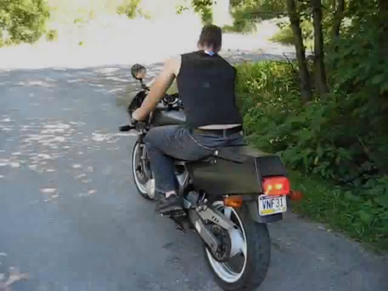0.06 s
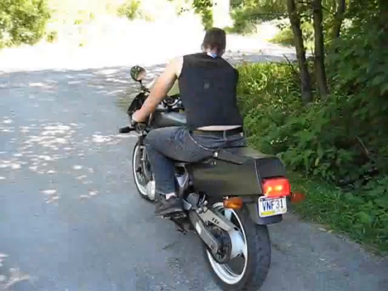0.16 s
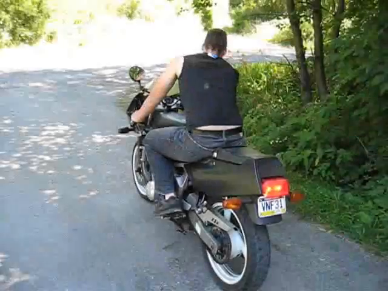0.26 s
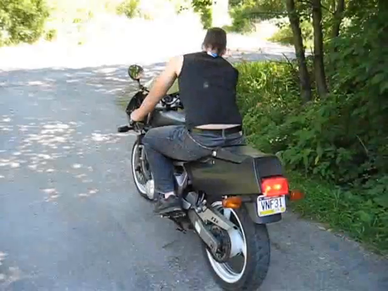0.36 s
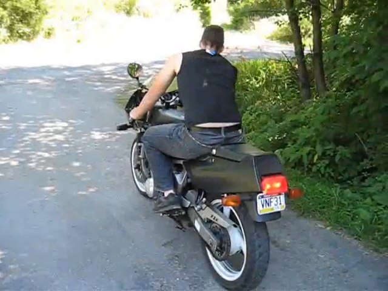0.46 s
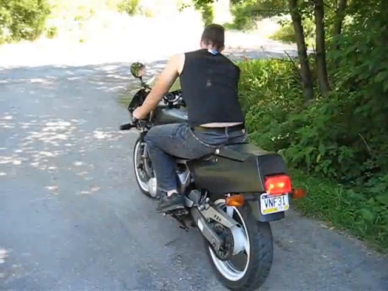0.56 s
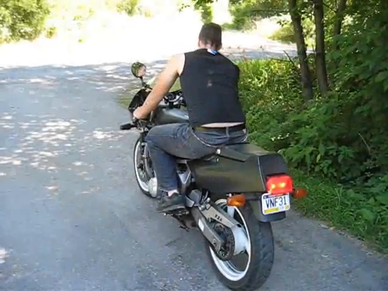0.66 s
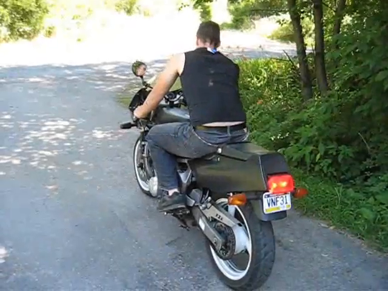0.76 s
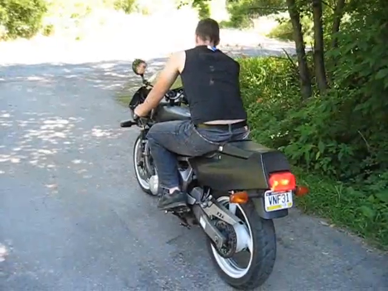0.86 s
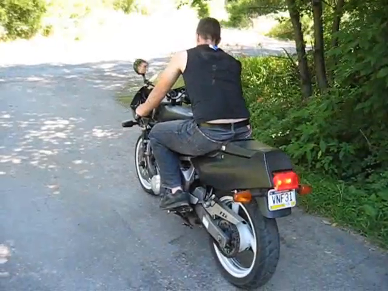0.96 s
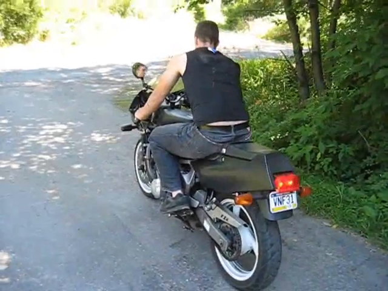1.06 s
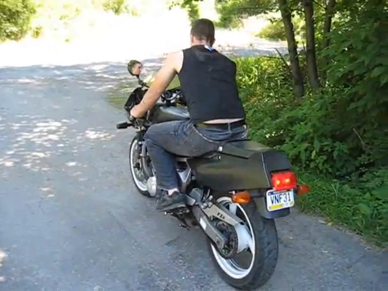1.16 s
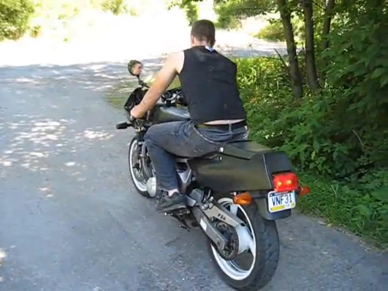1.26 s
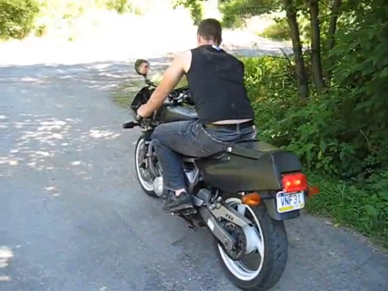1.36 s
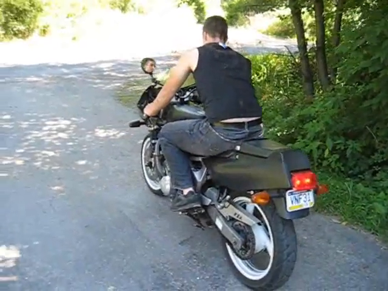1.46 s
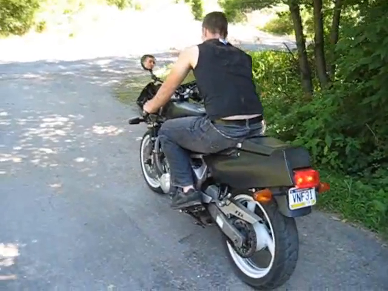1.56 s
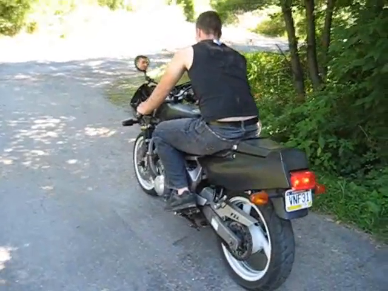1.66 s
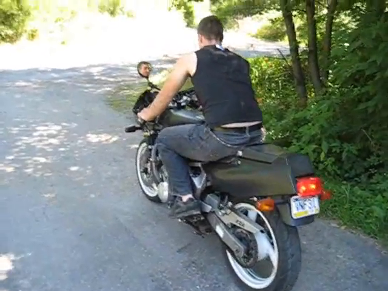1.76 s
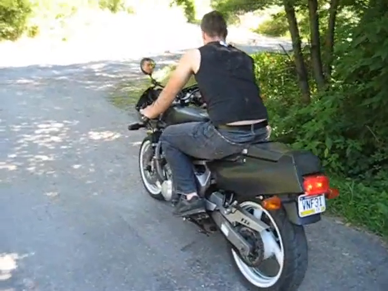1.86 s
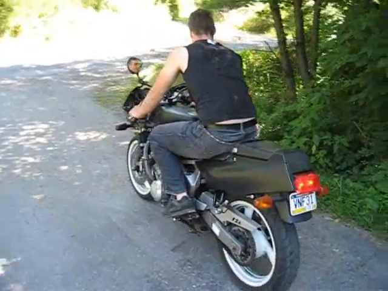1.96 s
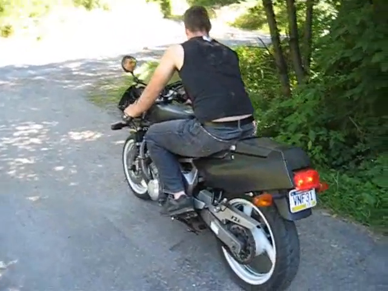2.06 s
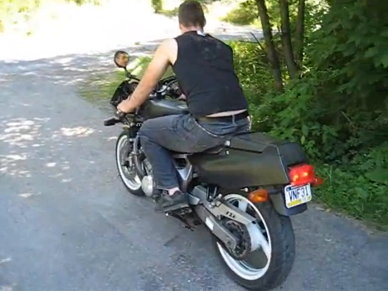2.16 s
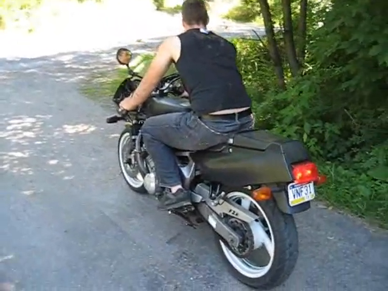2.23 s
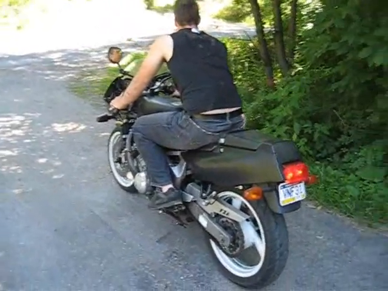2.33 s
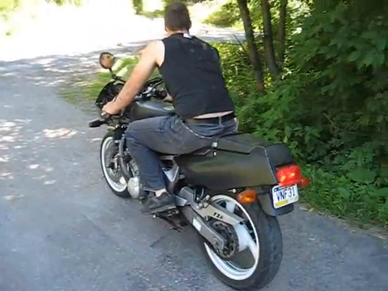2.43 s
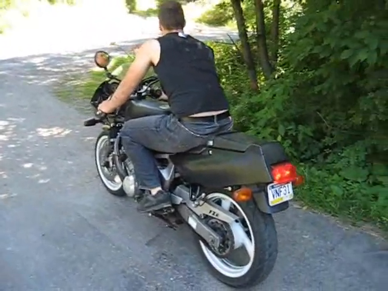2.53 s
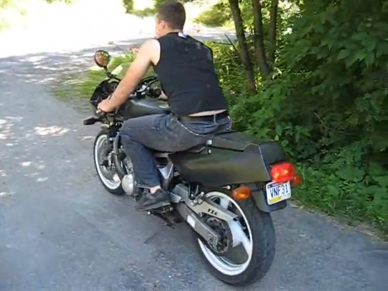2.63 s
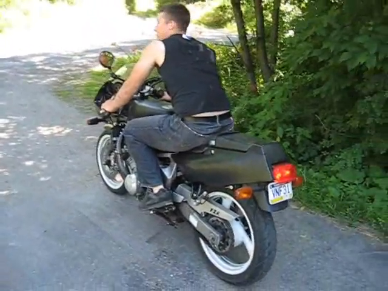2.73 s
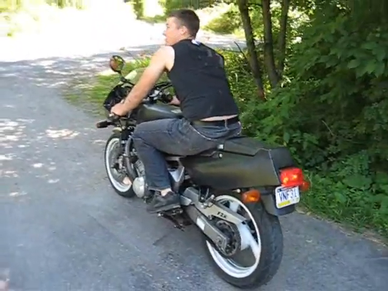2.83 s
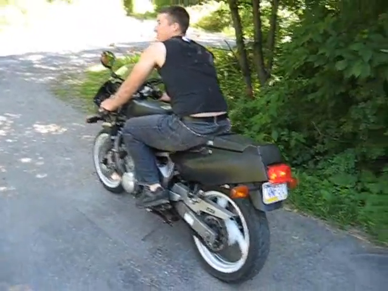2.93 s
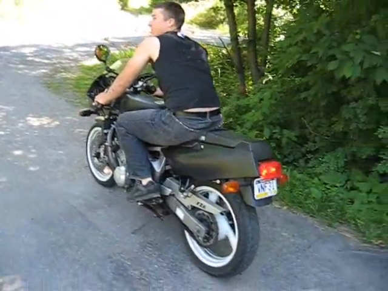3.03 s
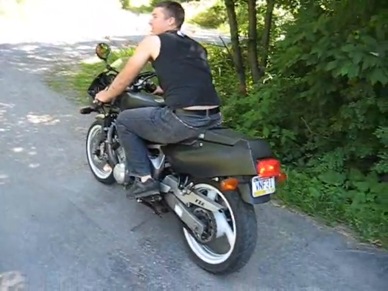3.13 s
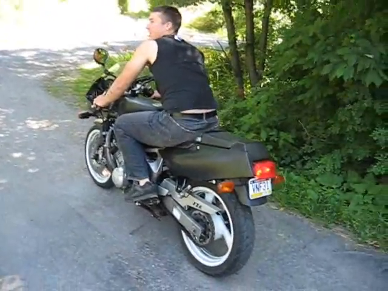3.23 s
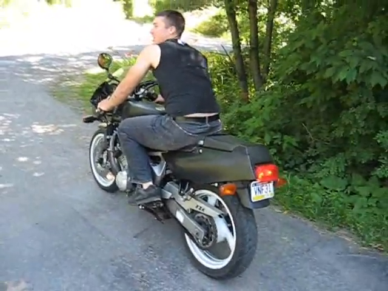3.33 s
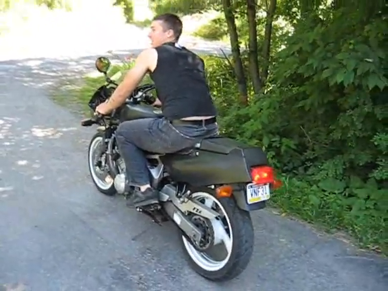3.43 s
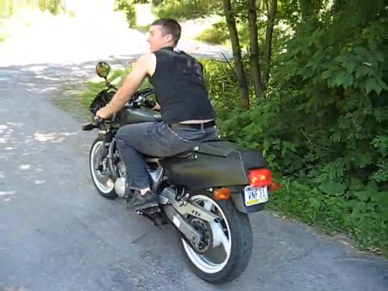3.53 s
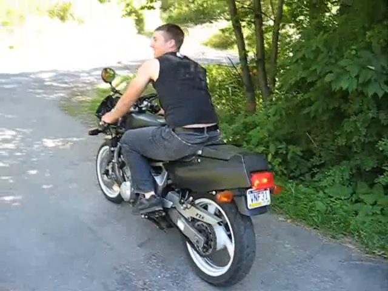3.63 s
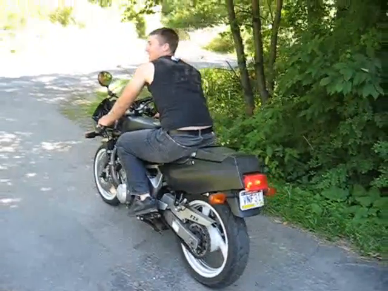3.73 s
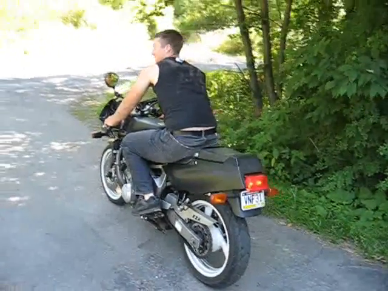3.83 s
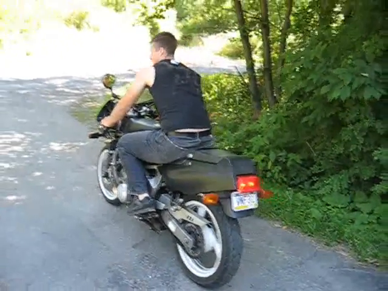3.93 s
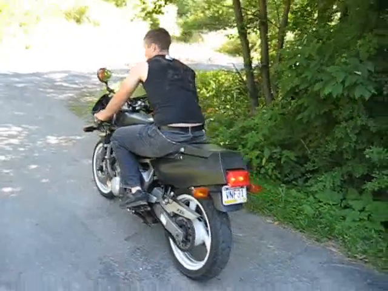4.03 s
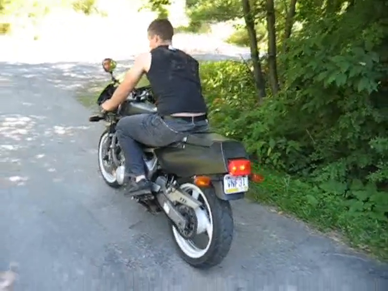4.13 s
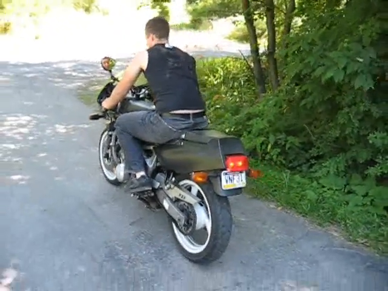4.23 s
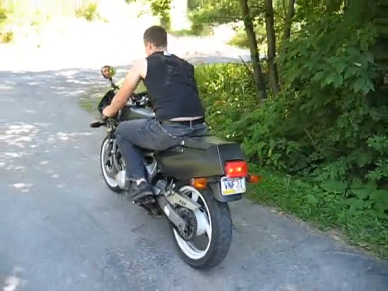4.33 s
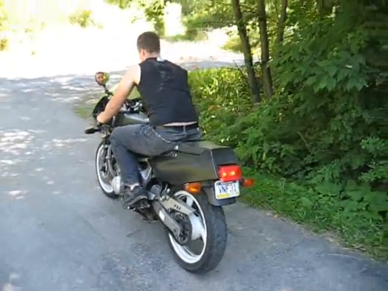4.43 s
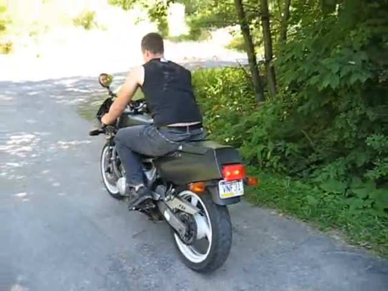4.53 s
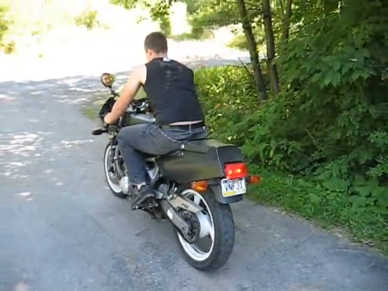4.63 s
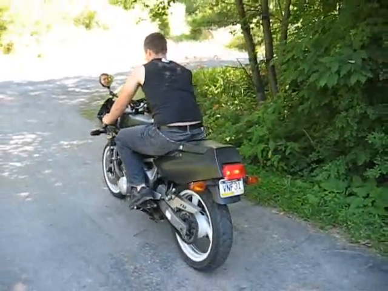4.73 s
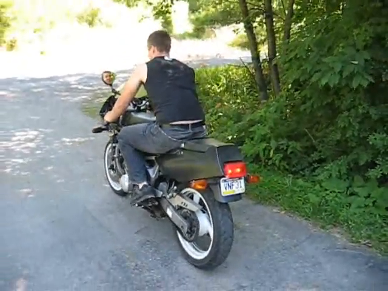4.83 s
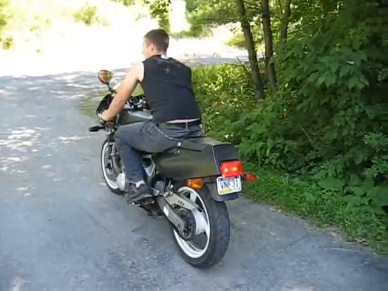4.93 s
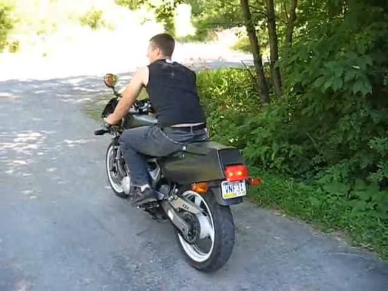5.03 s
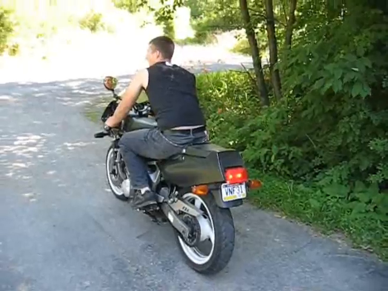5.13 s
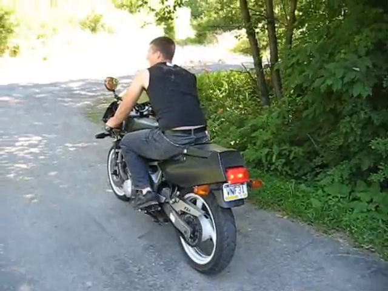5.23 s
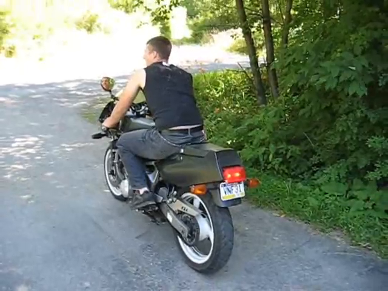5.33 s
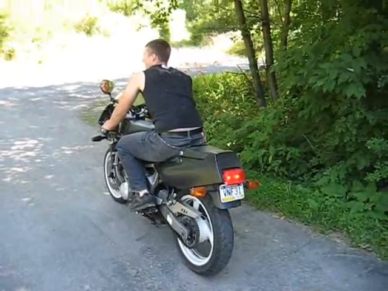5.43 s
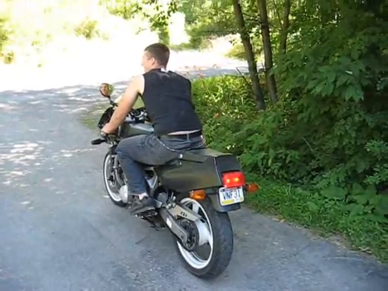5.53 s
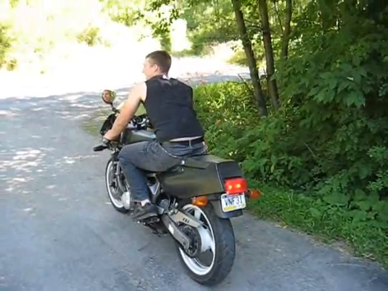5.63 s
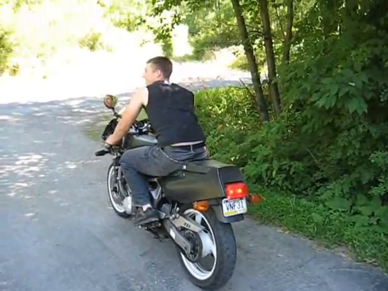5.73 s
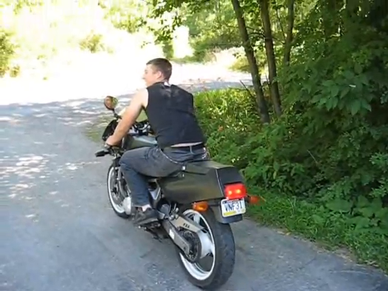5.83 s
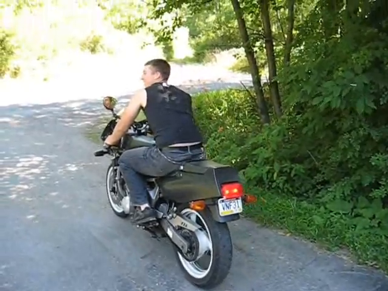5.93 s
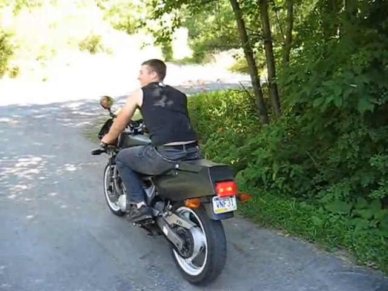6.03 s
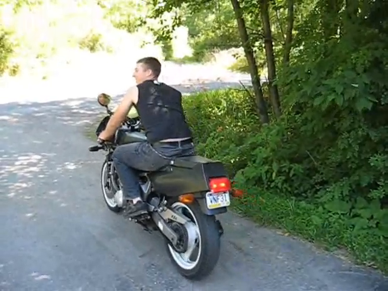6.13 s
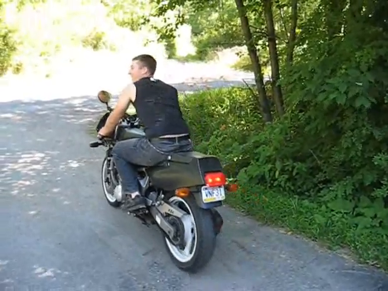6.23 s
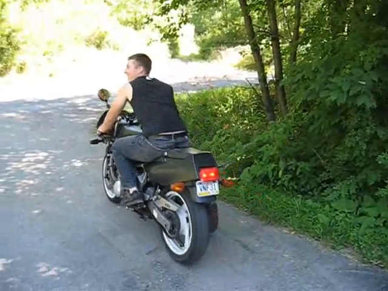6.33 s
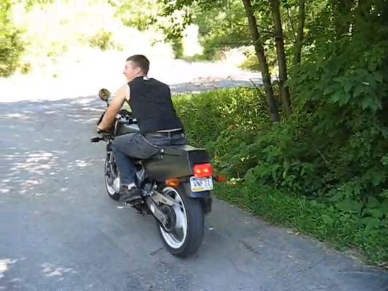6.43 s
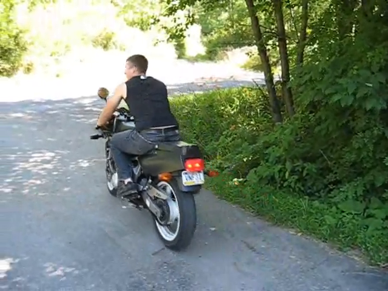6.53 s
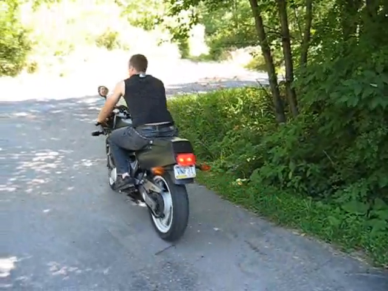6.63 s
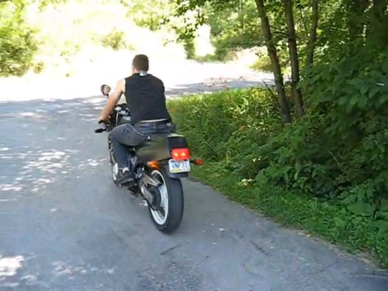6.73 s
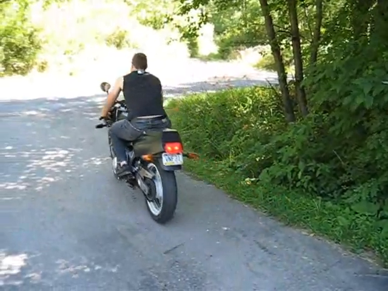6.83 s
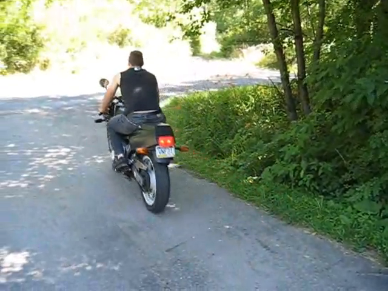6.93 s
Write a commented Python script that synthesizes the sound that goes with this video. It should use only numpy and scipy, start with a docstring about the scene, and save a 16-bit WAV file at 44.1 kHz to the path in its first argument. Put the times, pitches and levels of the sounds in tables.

```python
"""A four-cylinder motorcycle with open headers catches, idles unevenly, is blipped three times and pulls away.
Exhaust strokes kick resonant pipes, with stronger full burns at low revs and noise for the escaping gas.
Before it catches, the starter grinds and whines: noise through housing modes, and sliding overtones.
Birds whistle through tree echoes; thin steady sine tones fade out early over noise for the lane beside the trees.
A small recorder overloads and samples coarsely; its held values mirror the lower sound into the treble."""
import sys
import numpy as np
from scipy import signal
from scipy.fft import rfft, irfft, next_fast_len
from scipy.io import wavfile
from scipy.ndimage import uniform_filter1d

SR = 44100
rng = np.random.default_rng(int(sys.argv[2]) if len(sys.argv) > 2 else 0)


def log_audio(samples):
    """Write samples as a 16-bit WAV file to the path given in sys.argv[1]."""
    # one column per channel
    frames = np.atleast_2d(samples).T
    # limit to full scale, then quantise
    limited = np.clip(frames, -1, 1)
    pcm = np.round(limited * 32767).astype(np.int16)
    wavfile.write(sys.argv[1], SR, pcm)


N = 307818

# Crank speed as exhaust strokes: time_s, stroke_rate_hz
CRANK_SPEED = [(0.6, 30.0), (0.84, 36.4), (0.95, 39.0), (1.17, 31.3), (1.29, 37.0), (1.5, 40.2),
               (1.55, 48.2), (1.6, 66.0), (1.7, 138.9), (1.98, 88.9), (2.2, 56.2), (2.39, 43.1),
               (2.69, 47.5), (2.85, 68.3), (3.0, 118.7), (3.1, 136.9), (3.17, 143.3), (3.55, 89.1),
               (3.75, 62.9), (3.99, 45.8), (4.2, 41.8), (4.85, 41.1), (5.0, 74.1), (5.24, 60.5),
               (5.47, 39.8), (5.55, 40.9), (5.7, 52.0), (5.85, 85.5), (5.94, 89.5), (6.11, 93.1),
               (6.33, 84.4), (6.47, 72.6), (6.55, 69.2), (6.77, 63.9), (6.98, 69.2)]
# Runs of full burns at low revs, one a stroke: start_s, burn_count, first_level_db, later_level_db
BURN_RUNS = [(0.839, 2, -6.3, -7.1), (0.918, 2, -7.6, -6.7), (1.027, 2, -12, -7.9), (1.109, 1, -11, 0),
             (1.172, 3, -7, -8.5), (1.291, 2, -6.6, -6.9), (1.392, 2, -7.5, -7.5), (1.496, 3, -6.7, -6.6),
             (2.178, 1, -7.6, 0), (2.249, 2, -5.5, -8.2), (2.352, 2, -6.9, -6.7), (2.423, 2, -7.8, -6.7),
             (2.516, 3, -8.9, -6.4), (2.604, 2, -8.7, -7.3), (2.688, 9, -7.4, -8), (3.743, 2, -9.4, -10),
             (3.882, 2, -8.7, -13.7), (3.962, 1, -8.9, 0), (4.006, 1, -11.6, 0), (4.051, 2, -11.5, -8.8),
             (4.139, 1, -9.5, 0), (4.237, 2, -14.4, -9.8), (4.333, 2, -11.8, -8.7), (4.43, 2, -14.9, -10),
             (4.525, 2, -13.6, -9.2), (4.623, 2, -16.1, -10.8), (4.721, 2, -14.4, -9.9),
             (4.817, 6, -14.5, -8.5), (5.236, 1, -11.5, 0), (5.286, 1, -10.3, 0), (5.362, 1, -9.8, 0),
             (5.451, 2, -10.3, -9.4), (5.553, 3, -11.5, -8.2), (5.64, 8, -9.1, -9)]
# Spectrum of rattling gear teeth, also of fuel spits: frequency_hz, gain_db
TEETH_SPECTRUM = [(240, -73), (400, -36), (1060, -11.5), (1440, -6.5), (1520, -17.5), (2290, -8.5),
                  (5500, -4), (7150, -49), (12100, -120)]
BURN_LEAD_S = .0012  # strokes and burns start this long before their marked times


def engine():
    """Source-filter principle: stroke impulses excite pipe resonances, and gas flow adds turbulent noise."""
    t = np.arange(N) / SR
    exhaust_start_s = CRANK_SPEED[0][0]
    rate = curves(CRANK_SPEED)[0] * (t > exhaust_start_s)
    lean = np.clip((63 - rate) / 14, 0, 1)  # at low revs most strokes burn weakly
    turns = np.cumsum(rate) / SR
    burn_s, burn_db = burns(t, turns)
    train, pumping, uneven_db = strokes(t, rate, turns, lean)
    burn_train = spikes(burn_s - BURN_LEAD_S, amp(burn_db))
    sag_db = sag_after_burns(t, burn_s, lean)

    # Exhaust loudness: time_s, bark_level_db, thump_level_db, rasp_level_db, hiss_level_db
    loudness = [(0.8, -17, -11.5, -38.5, -41), (0.98, -21, -25, -38.5, -37.5),
                (1.05, -14.5, -22.5, -36, -35), (1.16, -19.5, -15.5, -32.5, -34), (1.3, -17, -16, -38, -39),
                (1.52, -17.5, -18.5, -38.5, -39.5), (1.61, -1.5, -12, -10, -18.5),
                (1.7, -15.5, -19.5, -18.5, -18), (1.79, -9.5, -15, -15.5, -20.5),
                (1.88, -16.5, -20, -26.5, -24.5), (1.99, -19, -13, -34, -36.5),
                (2.55, -16, -20, -39.5, -41.5), (2.84, -14.5, -18, -34, -35.5),
                (3.02, -11, -20, -19, -27.5), (3.1, -6.5, -35, -20, -18.5), (3.17, -9.5, -20.5, -16.5, -14),
                (3.21, -16.5, -19, -20, -21), (3.39, -11.5, -18.5, -24, -22.5),
                (3.47, -18.5, -17, -31, -36), (3.68, -21.5, -18, -41.5, -42),
                (4.25, -21.5, -23, -44.5, -46.5), (4.8, -25.5, -22.5, -46, -48.5),
                (4.9, -14.5, -20.5, -32.5, -36), (4.97, -11, -19, -24, -34), (5.02, -13.5, -21, -17.5, -34),
                (5.06, -22.5, -16.5, -41.5, -43), (5.55, -21, -25, -42.5, -46),
                (5.95, -11.5, -16.5, -24.5, -32.5), (6.27, -11, -19, -25, -38),
                (6.45, -20, -20, -35.5, -37.5), (6.75, -12, -20.5, -39, -38),
                (6.98, -17, -22.5, -40, -36.5)]
    bark_db, thump_db, rasp_db, hiss_db = curves(loudness)
    bark = header_bark(t, train, burn_train, uneven_db, lean, bark_db, sag_db, burn_s[0])
    thump = collector_thump(t, pumping, burn_train, thump_db, sag_db, burn_s[0])
    gas = gas_jets(train, burn_train, lean, rasp_db, hiss_db, sag_db)

    running = np.clip((t - exhaust_start_s) / 0.015, 0, 1)
    treble = running * gas + amp(-5.0) * fuel_spits()
    return running * (bark + thump) + treble + amp(-7.0) * trees(treble, t60=0.24)


def burns(t, turns):
    """Phase locking: each run of full burns follows the crank stroke by stroke; returns times and dB."""
    rows = []
    for start_s, count, first_db, later_db in BURN_RUNS:
        first_turn = np.interp(start_s, t, turns)
        for k in range(count):
            rows.append((first_turn + k, later_db if k else first_db))
    turn, level_db = np.transpose(rows)
    return np.interp(turn, turns, t), level_db


def strokes(t, rate, turns, lean):
    """Crank phase sets a quasi-periodic impulse train; unequal cylinders and burns scatter its strokes."""
    # Size of each cylinder's stroke: level_db
    cylinder_levels = [0, -3.4, -.6, -3.1]
    run_s = np.transpose(BURN_RUNS)[0] - BURN_LEAD_S
    # Shift the crank phase so that each run of burns starts on a stroke
    shift = np.unwrap(-np.interp(run_s, t, turns) % 1, period=1)
    turns = np.maximum.accumulate(turns + np.interp(t, run_s, shift))
    stroke = np.flatnonzero(np.diff(np.floor(turns)))

    chance = rng.standard_normal((len(stroke), 2))
    uneven_db = ragged(t, rate, lean)
    scatter_db = uneven_db[stroke]
    cylinder_db = np.resize(cylinder_levels, len(stroke))
    late_s = scatter_db * chance[:, 1] / (60 * rate[stroke])  # ragged burns also come early or late
    train = spikes(stroke / SR + late_s, amp(cylinder_db + scatter_db * chance[:, 0]))
    # Pistons pump more evenly, burn or not
    pumping = spikes(stroke / SR, amp(cylinder_db + scatter_db * chance[:, 0] * .6))
    return train, pumping, uneven_db


def ragged(t, rate, lean):
    """Cyclic variation of combustion: dB scatter grows as revs fall on a shut throttle and at a cold idle."""
    steady_db, idle_db, overrun_db = .7, .8, 5.3
    cold_db, warm_s = 3, 1.8
    opening, stumble_db = throttle(t)
    falling_revs = np.clip((105 - rate) / 15, 0, 1) * np.clip((rate - 40) / 25, 0, 1)
    overrun = (1 - opening) * falling_revs
    cold = np.exp(-np.abs(t - BURN_RUNS[0][0]) / warm_s)
    return steady_db + lean * (idle_db + cold_db * cold) + overrun_db * overrun + stumble_db


def throttle(t):
    """Control envelope: opening from shut (0) to open (1), and added scatter as it snaps shut."""
    # Throttle turns: open_s, shut_s, stumble_db (extra scatter at shutting)
    twists = [(1.5, 1.68, 0), (2.68, 3.18, 4.5), (4.83, 5.02, 2), (5.55, 7, 0)]
    grip_s = .04  # time taken to turn
    opening = sum(np.clip(np.minimum(t - a, b - t) / grip_s + .5, 0, 1) for a, b, _ in twists)
    stumble_db = sum(db * np.exp(-((t - b - grip_s) / grip_s) ** 2) for _, b, db in twists)
    return opening, stumble_db


def sag_after_burns(t, burn_s, lean):
    """Decay of excitation: at low revs the level sags some 0.03 s after a full burn; returns dB."""
    depth_db, delay_s = -5.5, 0.031
    last_burn_s = np.concatenate([[0], burn_s])[np.searchsorted(burn_s, t)]
    since_s = t - last_burn_s
    return uniform_filter1d(depth_db * lean * np.exp(-(delay_s / (since_s + 1e-4)) ** 4), size=400)


def header_bark(t, train, burn_train, uneven_db, lean, bark_db, sag_db, catch_s):
    """Pipe resonance: strokes ring the header modes, which rise as hot gas carries sound faster."""
    # Header modes idling: frequency_hz, width_hz, gain_db
    idle_modes = [(226.1, 21, 15.5), (277, 51, -10.5), (341, 38, -9.5), (429, 54, -18.5), (624, 67, -6)]
    # Header modes under load: frequency_hz, width_hz, gain_db
    hot_modes = [(262.4, 31, 2), (222.7, 42, -9), (366.6, 44, -15.5), (544.4, 45, -7), (644.5, 64, -8.5),
                 (817, 48, -8)]

    def open_end(f):
        """Radiation cutoff: a short open pipe radiates little below its first mode."""
        return modes(hot_modes)(f) / (1 + (195 / (f + 1)) ** 6)

    def header(x):
        """Crossfade of cool and hot resonances, after low-pass smoothing by the valve's gradual opening."""
        soft = filtered(x, lambda f: 1 / (1 + 1j * f / 600) ** 4)
        return lean * filtered(soft, modes(idle_modes)) + (1 - lean) * filtered(soft, open_end)

    # Turbulence keeps the pipe ringing between strokes
    swirl = .03 * (lean + uneven_db / 6) * rng.standard_normal(N)
    level = amp(bark_db - 4 * lean + 0.53 * sag_db) * (t > catch_s)
    ringing = level * even(header(train + swirl), span=0.055)
    slug = filtered(burn_train, lambda f: 1j * f / (40 + 1j * f) / (1 + 1j * f / 480) ** 4)
    return ringing + amp(32.5) * header(burn_train) + amp(25) * slug  # the slug of gas itself


def collector_thump(t, pumping, burn_train, thump_db, sag_db, catch_s):
    """Air-column resonance: the long column behind the headers answers only the lowest orders."""
    # Collector modes: frequency_hz, width_hz, gain_db
    column_modes = [(75.6, 18, 3.5), (136, 45, -12)]

    def collector(x):
        """Modal resonance confined to a low band."""
        return filtered(x, lambda f: modes(column_modes)(f) / (1 + (58 / (f + 1)) ** 6) / (1 + (f / 160) ** 6))

    cranking_db = -18.5  # change of level before the engine catches
    level = amp(thump_db + np.where(t < catch_s, cranking_db, sag_db))
    return level * even(collector(pumping), span=0.077) + amp(27) * collector(burn_train)


def gas_jets(train, burn_train, lean, rasp_db, hiss_db, sag_db):
    """Jet turbulence: noise pulsed by each stroke is coloured by pipe mouths, stubs and engine cases."""
    # Pipe-mouth modes, response squared in use: frequency_hz, width_hz, gain_db
    mouth_modes = [(883, 450, -10.5), (1314, 590, 3), (1652, 200, -1.5)]
    # Short pipe-stub modes, strongest at idle, response squared in use: frequency_hz, width_hz, gain_db
    stub_modes = [(632, 83, 0.5), (700, 110, -5)]
    # Spectrum of gas roar: frequency_hz, gain_db
    roar_spectrum = [(1180, -48.5), (2000, -11.5), (2640, -1), (2930, -2), (5500, -4), (7150, -14),
                     (12100, -120)]
    # Engine-case modes: frequency_hz, width_hz, gain_db
    case_modes = [(2316, 78, -7.5), (2910, 62, -3.5), (3610, 110, 1.5), (3893, 39, 1), (4577, 150, 2)]

    puffs = .4 + unit(dying(train, t60=.025)) / 2 + 4 * dying(burn_train, t60=.12)
    rasp = unit(filtered(puffs * rng.standard_normal(N), lambda f: modes(mouth_modes)(f) ** 2))
    purr = unit(filtered(puffs * rng.standard_normal(N), lambda f: modes(stub_modes)(f) ** 2))
    rasp = rasp + amp(-7 + 9 * lean) * purr
    hiss = filtered(puffs * rng.standard_normal(N),
                    lambda f: colour(roar_spectrum)(f) * np.abs(0.98 + modes(case_modes)(f)))
    rasp = amp(rasp_db + 0.48 * sag_db) * even(rasp, span=0.096)
    hiss = amp(hiss_db + 0.14 * sag_db) * even(hiss, span=0.073)
    return rasp + hiss


def fuel_spits():
    """Impulsive noise: fuel spitting in the header makes brief decaying bursts."""
    # Spits: start_s, level_db (relative)
    spit_events = [(1.1504, -18), (2.1808, -28), (4.5444, -19.5), (4.6424, -26), (5.012, -29)]
    spit_s, spit_db = np.transpose(spit_events)
    envelope = dying(spikes(spit_s, amp(spit_db)), t60=0.085)
    return envelope * unit(filtered(rng.standard_normal(N), colour(TEETH_SPECTRUM)))


def starter():
    """Modal excitation: gear teeth rattle the housing; the clutch knocks as the crank passes compression."""
    # Gear grind: time_s, level_db (relative)
    grind_curve = [(0.444, -65), (0.49, -16), (0.616, -15.5), (0.692, -23), (0.704, -15), (0.768, -38),
                   (0.79, -6.5), (0.858, -47), (0.87, -43)]
    # Clutch knocks: start_s, level_db (relative), t60_s (limited below)
    knock_events = [(0.4446, -7.5, 0.29), (0.4765, -14, 0.98), (0.6992, -9, 0.29), (0.7826, -18.5, 0.28)]
    # Starter-housing modes: frequency_hz, width_hz, gain_db
    housing_modes = [(1090, 11, -10), (1560, 13, -23), (1600, 25, 14.5), (2400, 70, -30), (2530, 46, -10),
                     (2880, 80, -1.5), (3220, 130, 0), (3920, 180, -3.5), (4690, 360, -1), (4610, 71, -15),
                     (5410, 16, 8.5), (5100, 31, -1)]

    t = np.arange(N) / SR
    envelope = amp(curves(grind_curve)[0] - 10) * (t > knock_events[0][0]) * (t < grind_curve[-1][0])
    for s, db, t60 in knock_events:
        decay_db = 60 * np.abs(t - s) / np.clip(t60, .02, .2)
        envelope = envelope + (t > s) * amp(db - 11.0 - decay_db)
    # Noise whose level jumps at random every 40 samples
    roughness = amp(3.4 * rng.standard_normal(N // 40 + 1)).repeat(40)[:N]
    teeth = rng.standard_normal(N) * roughness
    rattle = filtered(teeth, lambda f: colour(TEETH_SPECTRUM)(f) * np.abs(1.8 + modes(housing_modes)(f)))
    return envelope * unit(rattle)


def whine():
    """Harmonic series: meshing teeth whine on overtones that slide with the starter's speed."""
    # Gear mesh: time_s, pitch_hz, level_db
    mesh_curve = [(0.472, 824, -1), (0.49, 918.4, -20.5), (0.512, 899, -32.5), (0.548, 1121, -25.5),
                  (0.578, 1121, -26), (0.669, 894, -34)]
    t = np.arange(N) / SR
    hz, db = curves(mesh_curve)
    wobble = 0.016 * unit(uniform_filter1d(rng.standard_normal(N), 200))
    angle = 2 * np.pi * np.cumsum(hz * (1 + wobble)) / SR
    overtone_db = [-13.5, -6.5, -0.5, 2, 0.5]
    stack = sum(amp(level_db) * np.sin(k * angle) for k, level_db in enumerate(overtone_db, 1))
    fade = np.clip(np.minimum(t - mesh_curve[0][0], mesh_curve[-1][0] - t) / 0.045, 0, 1)
    return amp(db) * stack * fade


def birds():
    """Frequency modulation: whistled sine slides are heard mostly through diffuse echoes."""
    # Slides, one list a call: time_s, pitch_hz, level_db (relative)
    bird_calls = [
        [(0, 2610, -36), (.03, 2230, -49), (.07, 1990, -53), (.09, 1800, -84)],
        [(.29, 3070, -55), (.32, 3300, -43), (.35, 3370, -33), (.38, 4240, -39), (.4, 4810, -34),
         (.44, 4970, -54)],
    ]
    t, song = np.arange(N) / SR, np.zeros(N)
    for call in bird_calls:
        hz, db = curves(call)
        sounding = (t > call[0][0]) * (t < call[-1][0])
        song += amp(db) * sounding * np.sin(2 * np.pi * np.cumsum(hz) / SR)
    return 0.25 * song + amp(6.0) * trees(song, t60=0.31)


def lane():
    """Background spectrum: shaped noise for distant rumble and leaves, with thin phase-jittered tones."""
    # Quiet lane air: frequency_hz, gain_db
    air_spectrum = [(15, -9), (25, -7), (54, 1.5), (503, -21), (925, -19), (1360, -28), (2790, -20.5),
                    (2990, -23.5), (5500, -27), (7150, -84), (12100, -120)]
    # Thin steady tones: pitch_hz, level_db (relative)
    steady_tones = [(2772, -56.5), (3176, -62.5)]
    t = np.arange(N) / SR
    tones = np.zeros(N)
    for hz, db in steady_tones:
        drift = np.cumsum(.03 * rng.standard_normal(N))
        tones += amp(db + 7) * np.sin(2 * np.pi * hz * t + drift)
    air = amp(-38) * unit(filtered(rng.standard_normal(N), colour(air_spectrum)))
    return air + tones * np.clip(1.5 - t, 0, 1)  # the tones' level falls to nothing from 0.5 s to 1.5 s


def trees(x, t60):
    """Diffuse reverberation: echoes from trunks and leaves form noise that decays 60 dB in t60 seconds."""
    t = np.arange(SR // 2) / SR
    tail = rng.standard_normal(len(t)) * amp(-60 * t / t60)
    return signal.fftconvolve(x, tail / np.linalg.norm(tail))[:N]


def amp(db):
    """Logarithmic level: dB to amplitude gain."""
    return 10 ** (np.asarray(db) / 20)


def unit(x):
    """Mean-power normalization: scaled to rms 1."""
    return x / np.sqrt(np.mean(x ** 2) + 1e-20)


def even(x, span):
    """Short-time power normalization: held near rms 1 over spans in seconds."""
    size = int(span * SR)
    power = np.abs(uniform_filter1d(uniform_filter1d(x ** 2, size), size))
    return x / np.sqrt(power + 1e-4 * np.mean(x ** 2))


def curves(rows):
    """Linear interpolation: one value per sample for each column after the time."""
    s, *cols = np.transpose(rows)
    return [np.interp(np.arange(N) / SR, s, c) for c in cols]


def filtered(x, response):
    """Convolution theorem: the spectrum of x times a response of frequency."""
    m = next_fast_len(N + SR // 2)
    return irfft(rfft(x, m) * response(np.fft.rfftfreq(m, 1 / SR)), m)[:N]


def modes(table):
    """Modal superposition: causal response of resonances (frequency_hz, width_hz, gain_db)."""
    return lambda f: sum(amp(db) * 1j * f * w / (c * c - f * f + 1j * f * w) for c, w, db in table)


def colour(points):
    """Spectral envelope: gain through (frequency_hz, gain_db) points on a log axis."""
    hz, db = np.transpose(points)
    return lambda f: amp(np.interp(np.log(f + 1), np.log(hz + 1), db))


def spikes(s, size):
    """Impulsive excitation: one impulse at each time."""
    return np.bincount(np.clip(np.round(s * SR).astype(int), 0, N - 1), size, N)


def dying(x, t60):
    """Exponential decay: each impulse falls 60 dB in t60 seconds."""
    return signal.lfilter([1], [1, -amp(-60 / (t60 * SR))], x)


def scene():
    """Linear superposition: machine, birds and air add."""
    gears = starter() + whine()
    return (engine() + gears + amp(-6.5) * trees(gears, t60=0.19) + birds() + lane())[None]


def record(dry):
    """Overload, sampling and hold: saturation adds overtones and held steps mirror the spectrum."""
    hold_hz, top_hz = 11026, 15750  # converter rate and output cutoff
    x = filtered(dry[0], lambda f: f * f / np.abs(56 ** 2 - f * f + 1j * f * 70))  # the capsule drops deep bass
    x = x + .15 * x ** 2  # the preamplifier is lopsided near its limit
    x = x / (1 + np.abs(x / .5) ** 5) ** (1 / 5)
    # Coupling capacitor, then a band limit at half the converter rate
    x = filtered(x, lambda f: 1j * f / (40 + 1j * f) * (f < hold_hz / 2))
    tick = np.floor(np.arange(N) * hold_hz / SR)
    held = x[np.minimum(np.ceil(tick * SR / hold_hz).astype(int), N - 1)]
    steps = (np.round(held * 128) + 1 / 3) / 128  # 8-bit step size with a constant offset
    return (filtered(steps - steps.mean(), lambda f: f < top_hz) + steps.mean())[None]


dry = scene()
out = record(dry)
log_audio(out)
```